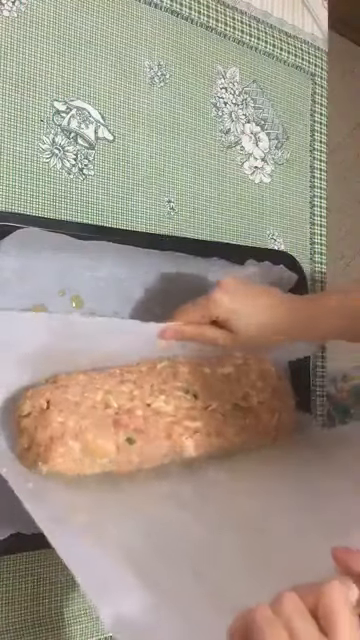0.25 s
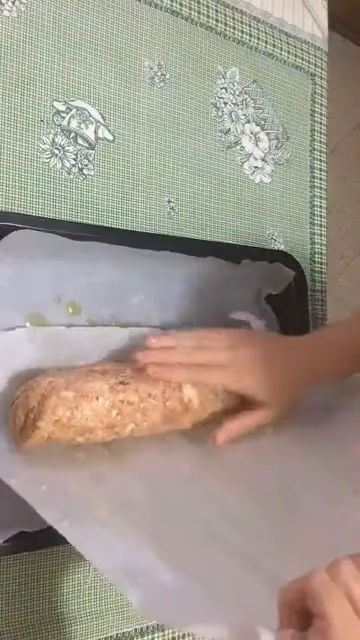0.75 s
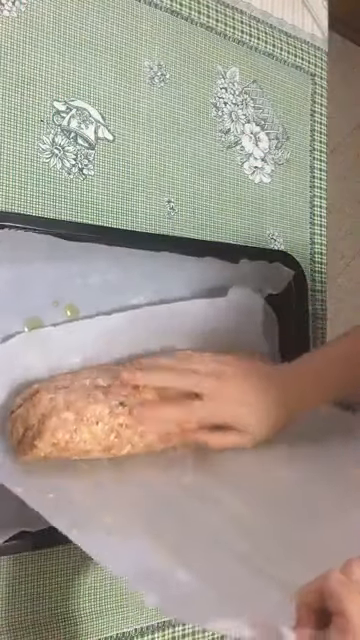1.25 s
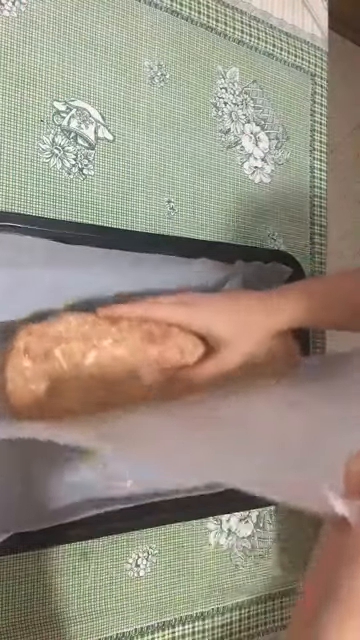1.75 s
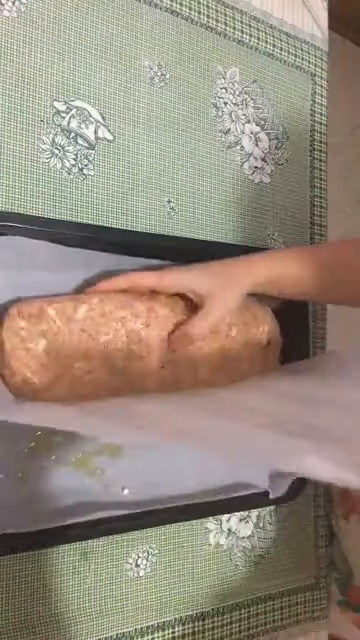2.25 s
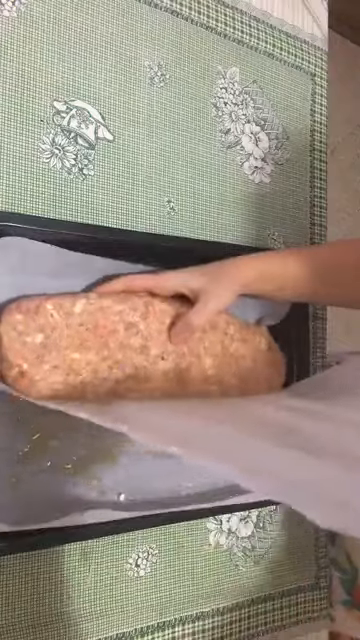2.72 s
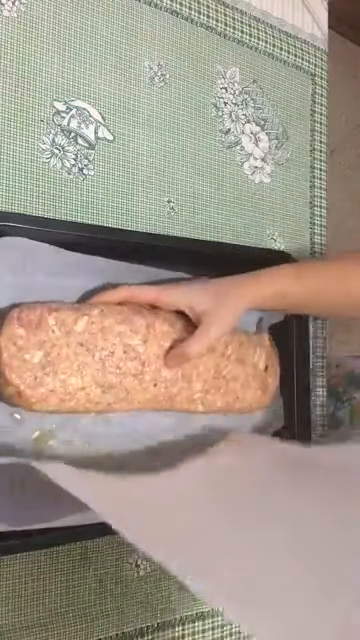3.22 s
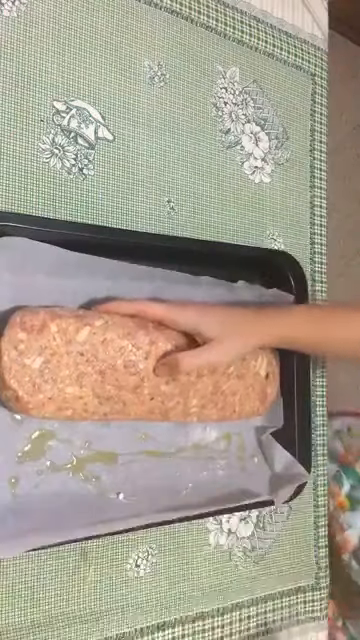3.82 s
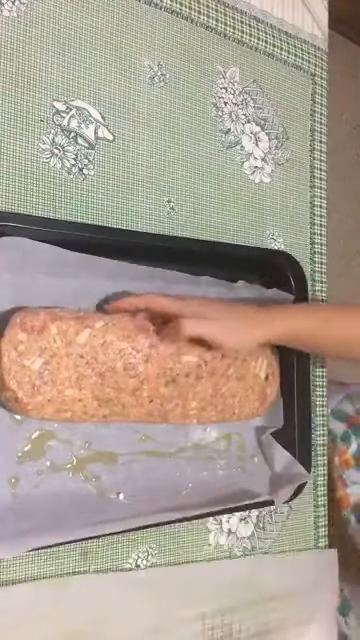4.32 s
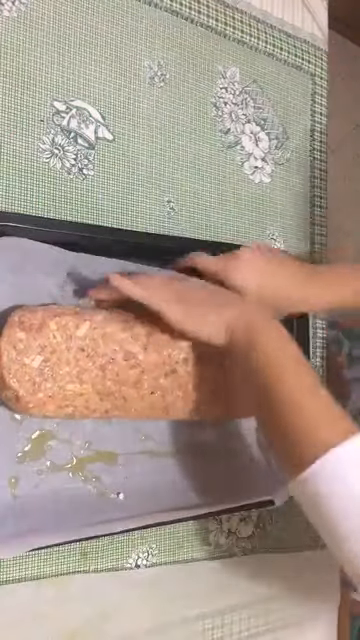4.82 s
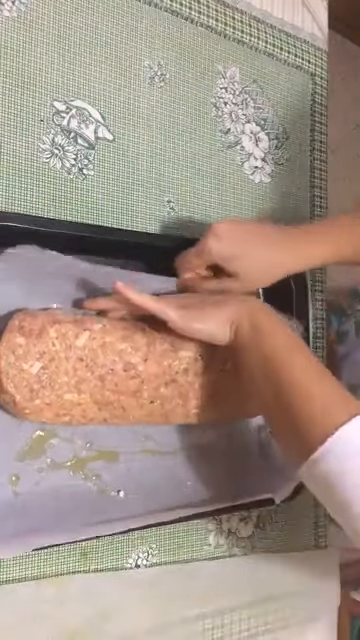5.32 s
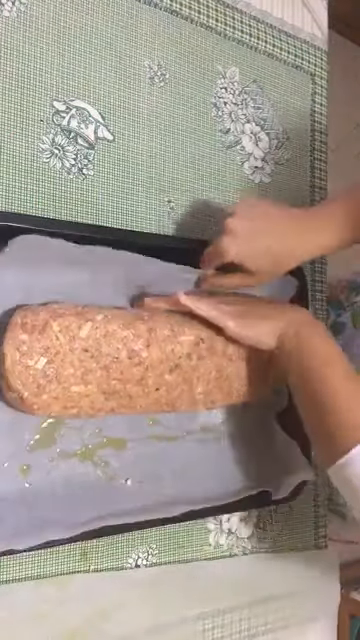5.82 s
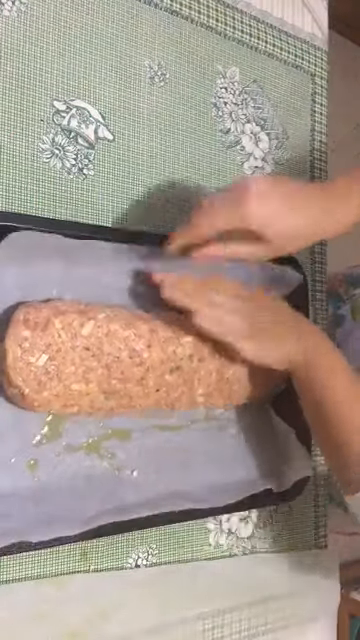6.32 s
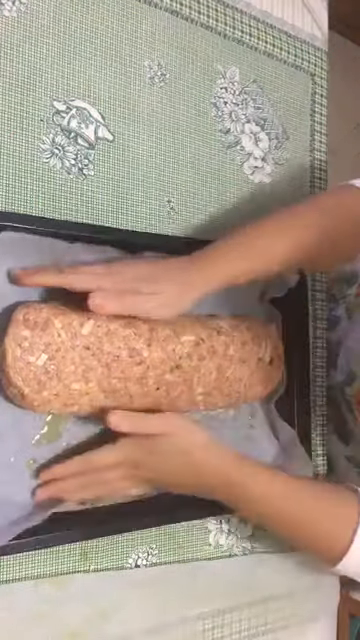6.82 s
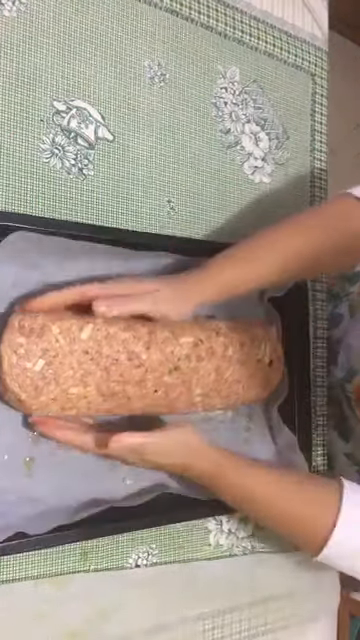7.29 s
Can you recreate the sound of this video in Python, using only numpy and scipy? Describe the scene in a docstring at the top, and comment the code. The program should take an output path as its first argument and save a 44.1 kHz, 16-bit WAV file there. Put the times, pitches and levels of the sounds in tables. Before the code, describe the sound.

Close, dry, mono sound in a small kitchen with very quiet steady air and short diffuse echoes. From 0 to 1.3 seconds parchment slides in soft, overlapping tugs, a dull rustle with fine crisp crackle and small snaps. A fuller stroke with brighter snaps comes around 1.9 to 2.0, then gentler rubbing and sparse ticks until 3.5. At about 3.75 a brisk crumple swells with a light tray scuff, fading to a near lull from 4.0 to 4.7, with a faint tray touch at 4.25. A low thump and metallic knock at 4.83 open the busiest part: dense bright crumpling and sharp snaps from 5.0 to 6.3, the hardest crack near 5.95. A brief dip at 6.45, then a strong papery scrape and soft table thud at 6.6, another thud at 6.9, a crisp burst at 7.06, and thinning crackle to the end at 7.5.

```python
"""Loaf, parchment and metal tray

A loaf is rolled off baking parchment onto a paper-lined tray on a kitchen table, then patted into shape.
The paper slides with a dull rustle and crackles as tiny creases flip: ringing grains mixed with smooth hiss.
Large folds buckle in snaps of band-passed noise; hands bump tray and table, which ring in decaying sines.
Low table rumble, steady room air and faint diffuse echoes surround it, all heard close up in mono."""
import sys
import numpy as np
from scipy import signal
from scipy.fft import rfft, irfft
from scipy.io import wavfile
from scipy.ndimage import uniform_filter1d

SR = 44100
rng = np.random.default_rng(int(sys.argv[2]) if len(sys.argv) > 2 else 0)


def inscribe(sig):
    """Save sig as 16-bit PCM at rate SR to the path in sys.argv[1].

    A 1-D sig is mono; a 2-D sig holds one channel per row.
    Samples are clipped to [-1, 1] before scaling.
    """
    pcm = np.round(np.clip(np.atleast_2d(sig).T, -1, 1) * 32767)
    wavfile.write(sys.argv[1], SR, pcm.astype(np.int16))


def boost(x):
    """Linear amplitude factor 10**(x/20) for a level x in decibels (scalar or array-like)."""
    u = np.asarray(x, float) / 20
    return 10 ** u


N = 332955


def curve(rows):
    """A (time in s, level in dB) table joined by straight lines, one value a sample."""
    s, level_db = np.transpose(rows)
    return np.interp(np.arange(N) / SR, s, level_db)


def coloured(x, spectrum):
    """Minimum-phase filter with the given spectrum, so nothing sounds early; rms 1."""
    size = 8192
    hz, db = np.transpose(spectrum)
    bins_hz = np.arange(size // 2 + 1) * SR / size
    log_gain = np.interp(np.log(bins_hz + 1), np.log(hz), db) * np.log(10) / 20
    # folding the cepstrum onto positive time makes the phase minimal
    cepstrum = irfft(log_gain)
    cepstrum[1:size // 2] *= 2
    cepstrum[size // 2 + 1:] = 0
    impulse = irfft(np.exp(rfft(cepstrum)))
    out = signal.fftconvolve(x, impulse)[:N]
    return out / np.sqrt(np.mean(out ** 2))


def placed(seconds, gains, shapes):
    """Short shapes laid on the time line."""
    out = np.zeros(N + len(shapes[0]))
    for s, gain, shape in zip(seconds, gains, shapes):
        start = round(s * SR)
        out[start:start + len(shape)] += gain * shape
    return out[:N]


def drift(rate_hz):
    """Slow chance: noise twice through a one-pole low-pass; spread 1."""
    r = np.exp(-2 * np.pi * rate_hz / SR)
    noise = rng.standard_normal(N + SR)
    slow = signal.lfilter([1], [1, -2 * r, r * r], noise)[SR:]     # the first second settles the filter
    return slow / np.std(slow)


def ring(clicks, hz, t60_s):
    """A resonance: a unit click sets a sine of height 1 ringing, down 60 dB after t60_s."""
    r = boost(-60 / (t60_s * SR))
    w = 2 * np.pi * hz / SR
    return signal.lfilter([0, np.sin(w)], [1, -2 * r * np.cos(w), r * r], clicks + 1e-18)


# Separate tugs and presses on the paper; levels are rms, before the treble changes.
# Columns: peak_s, crackle_db, slide_db, rise_s, fall_s
# rise_s and fall_s take crackling through 20 dB; anything under 0.005 s acts as 0.005 s
MOVES = [(0.0, -48, -52.5, .1, 0.26), (.3, -50, -61, .03, 0.1), (0.451, -43.5, -51, .35, 0.19),
         (0.631, -45, -52.5, .025, 0.35), (0.781, -43, -48, .3, 0.27), (0.961, -50, -51.5, .2, -0.18),
         (1.119, -58.5, -58, 0.33, 0.2), (1.3, -47.5, -51.5, 0.085, 0.44), (1.472, -47.5, -57.5, .7, 0.67),
         (1.89, -42.5, -54.5, .25, 0.5), (2.003, -45, -48.5, .2, 0.1), (2.499, -46.5, -52.5, .6, 0.42),
         (3.148, -53, -57, .5, 0.5), (3.516, -44.5, -53.5, .02, 0.12), (3.679, -53.5, -78, .2, 0.35),
         (3.77, -37, -44.5, 0.11, 0.31), (4.15, -61, -71, 0.085, 0.54), (4.216, -62, -49, 0.13, 0.18),
         (4.644, -65.5, -75, .04, 0.27), (4.839, -53, -77, 0.034, 0.7), (4.928, -63, -50, 0.091, 0.44),
         (5.01, -47.5, -62, 0.014, 0.7), (5.079, -38, -74, .05, 0.35), (5.254, -34, -46, 0.09, 0.15),
         (5.38, -36, -49.5, .12, 0.2), (5.486, -40.5, -52, .12, 0.2), (5.64, -43.5, -51, 0.013, -0.8),
         (5.732, -33, -47.5, .12, 0.12), (5.885, -34, -52, .08, 0.13), (5.957, -37.5, -46.5, .08, 0.21),
         (6.071, -36, -53.5, 0.13, 0.36), (6.226, -41.5, -62.5, .03, -0.5),
         (6.29, -40.5, -46.5, .2, 0.1449), (6.579, -35, -46.5, .005, 0.0854),
         (6.612, -38, -39.5, .02, 0.09), (6.709, -38, -51, 0.057, 0.11), (6.901, -39.5, -56, 0.2, 0.27),
         (6.981, -41.5, -55, 0.11, -0.05), (7.064, -35.5, -52, 0.01, 0.0749),
         (7.205, -47.5, -53.5, .008, 0.22), (7.38, -43.5, -57, .2, 0.06), (7.55, -51.5, -59.5, .08, 2)]


def handling():
    """Each move swells to its peak and dies away; their powers add to give crackle and sliding level in dB."""
    roundness = 1.22     # above 1 a move holds near its peak, then stops quickly
    slide_lingers = 1.24     # sliding loses fewer dB than crackling away from the peak
    rest_crackle_db, rest_slide_db = -80, -73.5     # the paper settling between moves
    t = np.arange(0, N + 64, 64) / SR
    peak_s, crackle_db, slide_db, rise_s, fall_s = np.transpose(MOVES)[:, :, None]
    before = (peak_s - t) / np.maximum(rise_s, .005)
    after = (t - peak_s) / np.maximum(fall_s, .005)
    away_db = 20 * np.where(t < peak_s, before, after) ** roundness
    crackle = np.sum(boost(crackle_db - away_db) ** 2, axis=0) + boost(rest_crackle_db) ** 2
    slide = np.sum(boost(slide_db - away_db / slide_lingers) ** 2, axis=0) + boost(rest_slide_db) ** 2
    return [np.interp(np.arange(N) / SR, t, 10 * np.log10(power)) for power in (crackle, slide)]


def creases(per_s, spread_db, clump_db, cycles, low_hz, high_hz):
    """Tiny creases flip at random, in clumps; each rings at one of 14 pitches, down 60 dB after `cycles`."""
    sizes = boost(spread_db * np.minimum(rng.exponential(1, N), 5)) * rng.choice([-1, 1], N)
    chance = per_s * boost(clump_db * drift(30)) / SR     # per_s is the rate when the drift is at zero
    clicks = sizes * (rng.random(N) < chance)
    pitches = np.geomspace(low_hz, high_hz, 14)
    dealt = rng.integers(0, 14, N)
    return sum(ring(clicks * (dealt == k), hz, cycles / hz) for k, hz in enumerate(pitches))


def rustle(grains, grain_share, colour, flicker_db, flicker_hz):
    """Grains over the smooth hiss of paper rubbing on paper, both in the colour of the sheet; rms 1."""
    white = signal.lfilter([1, -.7], [1], grains)     # the summed rings lean to the bass; level them
    hiss = rng.standard_normal(N)
    mix = np.sqrt(grain_share) * white / np.std(white) + np.sqrt(1 - grain_share) * hiss
    return coloured(mix * boost(flicker_db * drift(flicker_hz)), colour)


def brightened(x, bright_db, split_hz):
    """Taut, dry paper lifts the treble; slack paper loses it."""
    treble = signal.sosfilt(signal.butter(2, split_hz, "high", fs=SR, output="sos"), x)
    body = signal.sosfilt(signal.butter(2, split_hz, fs=SR, output="sos"), x)
    return body - boost(bright_db) * treble     # the two halves meet in opposite phase


# Spectrum of the crackle, relative. Columns: pitch_hz, level_db (per Hz)
CRACKLE_COLOUR = [(290, -91), (500, -64), (1440, -1.5), (3110, 0.5), (3810, -2), (8700, -1.5),
                  (10400, -4.5), (12700, -5), (16000, -2.5)]
# Treble lift of the crackle, before the dulling of strong crumpling. Columns: time_s, level_db
CRACKLE_TREBLE = [(0, -6), (.95, 2), (1.1, -9), (1.35, -0.5), (3.1, 3.5), (3.4, 4.5), (3.6, -2.5),
                  (4.1, -4.5), (4.3, 6), (4.57, 0), (4.63, 19), (4.95, 6.5), (5.1, 0.5), (6.3, -3.5),
                  (6.55, -19), (6.6, 2), (7.1, -0.5), (7.25, 9), (7.55, -5.5)]


def paper_crackle(crackle_db):
    """Fine, short-ringing creases; strong crumpling sounds fuller, with less treble."""
    dulling, even_at_db = 0.11, -60     # dB of treble lost per dB of crackle above even_at_db
    bright_db = curve(CRACKLE_TREBLE) - dulling * (crackle_db - even_at_db)
    fine = creases(per_s=2500, spread_db=4, clump_db=6, cycles=5, low_hz=1300, high_hz=14000)
    sheet = rustle(fine, grain_share=0.36, colour=CRACKLE_COLOUR, flicker_db=2.6, flicker_hz=25)
    return brightened(boost(crackle_db) * sheet, bright_db, split_hz=5400)


# Spectrum of the sliding, relative, before its treble drifts. Columns: pitch_hz, level_db (per Hz)
SLIDE_COLOUR = [(130, -9.5), (220, -6.5), (350, -4), (480, -9.5), (700, -1.5), (1400, 3.5), (2000, 0),
                (3200, -3), (8000, -31.5)]


def paper_slide(slide_db):
    """Coarse, longer-ringing creases under much hiss give a dull rustle of drifting brightness."""
    coarse = creases(per_s=1500, spread_db=3, clump_db=3, cycles=14.5, low_hz=428, high_hz=2800)
    sheet = rustle(coarse, grain_share=0.13, colour=SLIDE_COLOUR, flicker_db=1.5, flicker_hz=230)
    # the sheet's curve keeps changing
    return brightened(boost(slide_db) * sheet, 1.5 * drift(4), split_hz=1200)


# Table rumble while the hands work. Columns: time_s, level_db (rms)
RUMBLE_LEVEL = [(0.0, -67.5), (1.2, -66), (2.2, -77.5), (3.6, -68), (4.6, -75.5), (5.9, -67), (6.5, -69),
                (7.55, -71)]
# Spectrum of the rumble, relative. Columns: pitch_hz, level_db (per Hz)
RUMBLE_COLOUR = [(20, -11), (35, -3), (50, -6), (100, -6), (200, -14.5), (400, -11), (800, -48)]


def table_rumble():
    """Low coloured noise of the table, following the work of the hands."""
    return boost(curve(RUMBLE_LEVEL)) * coloured(rng.standard_normal(N), RUMBLE_COLOUR)


# Spectrum of the room air, relative. Columns: pitch_hz, level_db (per Hz)
AIR_COLOUR = [(18, -45), (30, -18), (170, -4.5), (259, -3.5), (303, -8), (355, 0), (426, -36.5),
              (1540, -61), (13700, -43), (16000, -79)]


def room_air():
    """The kitchen's steady air: coloured noise at -73.5 dB rms."""
    return boost(-73.5) * coloured(rng.standard_normal(N), AIR_COLOUR)


def snaps(folds):
    """A fold shudders as it gives, cracks over and shudders out, round its centre pitch with a thin edge above."""
    width_oct, crack_s = .9, .0003     # half-width of the band; time constant of the crack
    shudder_db, edge_db = -2.5, -9     # against the crack; treble edge against the band
    rise_share = .16     # part of the length spent shuddering before the crack
    size, lead = 2048, 512
    t = (np.arange(size) - lead) / SR
    bursts = []
    for (_, _, hz, ms), noise in zip(folds, rng.standard_normal((len(folds), size))):
        length_s = np.clip(ms, .5, 20) / 1000
        shudder = np.exp(-np.abs(t) / np.where(t < 0, rise_share * length_s, (1 - rise_share) * length_s))
        crack = (t >= 0) * np.exp(-np.abs(t) / crack_s)
        give = noise * (crack + boost(shudder_db) * shudder)
        low_hz, high_hz = hz / 2 ** width_oct, min(hz * 2 ** width_oct, .45 * SR)
        band = signal.lfilter(*signal.butter(2, (low_hz, high_hz), "band", fs=SR), give)
        edge = signal.lfilter(*signal.butter(2, min(high_hz, 8000), "high", fs=SR), give)
        burst = band + boost(edge_db) * edge
        bursts.append(burst / np.sqrt(2 * np.max(uniform_filter1d(burst ** 2, size=16))))
    start_s, peak_db = np.transpose(folds)[:2]
    return placed(np.maximum(start_s - lead / SR, 0), boost(peak_db), bursts)


# The clearest folds that buckle. Columns: crack_s, peak_db, centre_hz, length_ms
# length_ms sums the shudder's two time constants and acts only between 0.5 and 20 ms
CLEAR_FOLDS = [(.0911, -29.5, 3700, 2.8), (.1719, -34, 2300, 2.9), (.207, -29.5, 3350, 4.1),
               (.2214, -35, 2980, 2.8), (.2344, -38, 8360, 2), (.2478, -35.5, 1370, 2.2),
               (.2975, -35.5, 3040, 3), (.4859, -24, 1490, 4.1), (.5016, -28, 7300, 1.9),
               (.648, -23.5, 2210, 6.4), (.8815, -32.5, 4500, 2), (.8903, -34, 3500, 2),
               (.899, -29, 2270, 3), (1.047, -45, 1300, 6.7), (1.2812, -26.5, 2310, 2.8),
               (1.5127, -30.5, 7220, 0.85), (1.7622, -33, 4330, 7.2), (1.8228, -30, 4870, 10.4),
               (1.868, -27, 3640, 2.5), (1.8861, -20.5, 6500, 7.5), (1.978, -30, 4260, 16),
               (2.0138, -29.5, 4230, 2.8), (2.368, -32.5, 3460, 3.6), (2.5491, -26.5, 3030, 0.93),
               (2.8313, -39, 2530, 6.7), (3.144, -32, 5830, 29), (3.165, -32, 4730, 4),
               (3.196, -31, 3280, 1.7), (3.212, -34, 2240, 1.5), (3.2448, -28, 5400, 2.6),
               (3.3282, -34, 2380, 4.9), (3.341, -29.5, 5300, 1.8), (3.375, -36, 1700, 2),
               (3.5255, -35, 2520, 6.2), (3.7447, -21.5, 4330, 20), (3.769, -19, 3140, 3),
               (3.8225, -35, 2470, 6.7), (3.8495, -29.5, 6000, 3.6), (3.8838, -22.5, 4340, 0.43),
               (3.9234, -28.5, 5960, 2.1), (4.188, -39, 1980, 6.3), (4.2576, -32.5, 1490, 8),
               (4.381, -40.5, 5150, 4.3), (4.687, -35, 5900, 6.7), (4.8265, -28, 7700, 5.6),
               (4.8275, -19, 1030, 5), (5.005, -17, 8700, 4.5), (5.064, -21, 4600, 4.4),
               (5.0827, -18, 7600, 4.7), (5.0926, -16.5, 4300, 2.1), (5.13, -26, 3480, 4),
               (5.202, -26, 2880, 14), (5.22, -13.5, 4970, 1), (5.232, -16, 5200, 3.5),
               (5.247, -14, 4500, 3.7), (5.2574, -14.5, 4460, 10.5), (5.303, -26.5, 2380, 21),
               (5.3193, -15.5, 6200, 1.5), (5.357, -37, 3800, 3.1), (5.371, -18, 2760, 4.2),
               (5.384, -26, 4000, 3.4), (5.422, -25.5, 4730, 2.5), (5.483, -28.5, 4640, 8.9),
               (5.6284, -20.5, 2070, 3.7), (5.7097, -19.5, 2260, 3.8), (5.7278, -16.5, 4870, 2.4),
               (5.7325, -19, 2400, 3.6), (5.7467, -14.5, 2860, 1.5), (5.8716, -13, 5950, 3.6),
               (5.8821, -22.5, 3470, 7.6), (5.904, -21, 4000, 9.9), (5.917, -21, 6500, 10),
               (5.9481, -6, 3820, 1.25), (6.0263, -22, 2880, 4.3), (6.0835, -25, 2960, 16),
               (6.218, -22.5, 2780, 3.2), (6.2304, -21.5, 2100, 6.1), (6.2543, -22.5, 5460, 4.8),
               (6.2989, -25, 1480, 13), (6.355, -24, 4360, 1.8), (6.434, -39, 4000, 4.8),
               (6.5785, -20.5, 4140, 7.2), (6.585, -24, 3440, 15), (6.6116, -20, 2750, 6.2),
               (6.6364, -24, 1360, 8.6), (6.7053, -19, 3230, 9), (6.7404, -23.5, 5240, 2.1),
               (6.809, -23.5, 2800, 1.6), (6.8228, -30, 4000, 4), (6.8519, -27, 4300, 2),
               (6.891, -27, 4000, 15), (6.9424, -28, 5200, 9.9), (6.9675, -26.5, 7070, 6),
               (7.0545, -21.5, 4500, 4), (7.0635, -17, 4640, 13), (7.204, -27.5, 5360, 8.8),
               (7.33, -25.5, 5070, 3.2), (7.368, -32.5, 5000, 8.9)]


def large_folds():
    """Large folds store the strain of the sheet, then buckle in distinct snaps."""
    return snaps(CLEAR_FOLDS)


def small_folds(crackle_db, count):
    """Lesser folds buckle at random, more often and louder where the paper is worked hard."""
    over_db, spread_db = 6, 1.8     # least height above the crackle; random extra
    chance, size = rng.random(count), rng.exponential(1, count)
    pitch, length = rng.standard_normal((2, count))
    busy = np.cumsum(boost(crackle_db / 4))
    at = np.searchsorted(busy, chance * busy[-1])
    peak_db = crackle_db[at] + over_db + spread_db * np.minimum(size, 3)
    centre_hz, length_ms = 4000 * 1.7 ** pitch, 4 * 1.5 ** length
    return snaps(np.transpose([at / SR, peak_db, centre_hz, length_ms]))


# Hands land on the tray; levels are drive into the modes.
# Columns: start_s, table_db, tray_db, contact_ms, hardness_db (per octave), spot (0-1 along the tray)
BUMPS = [(0.205, -71, -52, 2.2, -1, .42), (3.736, -62, -37, 15, 4, .21), (4.252, -85, -38, 16, 8, .36),
         (4.271, -85, -46, 115, 4, .35), (4.826, -42.5, -30, 1.5, -0.5, .22),
         (4.885, -70, -33, 105, 7, .43), (5.635, -62, -68, 6.4, 4, .22), (6.301, -68, -46, 110, -3, .3),
         (6.599, -45.5, -50, 15, 6, .22), (6.906, -44, -58, 18.6, -4, .42), (7.228, -66, -40, 125, 3, .43)]
# Low resonances of the table. Columns: pitch_hz, level_db, t60_s
TABLE_MODES = [(47.4, 1, 0.54), (65, 4, 0.33), (98, -1, 0.21), (133, -2, 0.46)]
# Resonances of the metal tray, before its bass is thinned. Columns: pitch_hz, level_db, t60_s
TRAY_MODES = [(352, -2, .16), (520, -9, .06), (657, -1, .1), (775, -3, .09), (1010, -7, .06),
              (1245, -1, .08), (1340, -4, .07), (1530, -5, .05)]


def bumps(rubbing):
    """A hand pushes smoothly on the table and roughly on the tray, which the sliding paper rings too."""
    middle_hz, thin_hz = 760, 287     # pivot of the hardness tilt; bass cut of the tray
    rattle_db, rattle_s = -14.5, 0.046
    t = np.arange(8192) / SR
    start_s, table_db, tray_db, contact_ms, hardness_db, spot = np.transpose(BUMPS)
    touch = np.sin(np.pi * np.clip(t / (contact_ms[:, None] / 1000), 0, 1)) ** 2
    push = touch / np.sum(touch, axis=1, keepdims=True)
    # the tray rattles on after the touch
    rough = touch ** 0.35 + boost(rattle_db) * np.exp(-t / rattle_s)
    scuff = rng.standard_normal(touch.shape) * rough / np.sqrt(np.sum(rough ** 2, axis=1, keepdims=True))
    table, tray = np.zeros(N), np.zeros(N)
    for hz, level_db, t60_s in TABLE_MODES:
        table += ring(placed(start_s, boost(table_db + level_db), push), hz, t60_s)
    for k, (hz, level_db, t60_s) in enumerate(TRAY_MODES):
        # knuckles and nails favour the high modes
        blow_db = tray_db + hardness_db * np.log2(hz / middle_hz)
        # a mode stays quiet when touched at one of its nodes
        reach = np.sin(np.pi * (k + 1) * spot)
        drive = placed(start_s, reach * boost(blow_db), scuff) + rubbing
        tray += boost(level_db) * ring(drive, hz, t60_s)
    # the tray's ringing keeps clear of the bass
    return table + signal.lfilter(*signal.butter(2, thin_hz, "high", fs=SR), tray)


def kitchen_echoes(x):
    """Diffuse echoes: noise that dies away, duller than the direct sound."""
    t60_s, first_wall_s, wall_cut_hz = 0.21, 0.0079, 3000
    t = np.arange(SR // 2) / SR
    echoes = rng.standard_normal(len(t)) * boost(-60 * t / t60_s) * (t > first_wall_s)
    echoes = signal.lfilter(*signal.butter(1, wall_cut_hz, fs=SR), echoes)
    return signal.fftconvolve(x, echoes / np.sqrt(np.sum(echoes ** 2)))[:N]


def scene():
    """Paper, tray and table in a kitchen with its steady air, the same in both channels."""
    crackle_db, slide_db = handling()
    slide = paper_slide(slide_db)
    paper = paper_crackle(crackle_db) + slide + large_folds() + small_folds(crackle_db, count=45)
    echoes = boost(-17) * kitchen_echoes(paper)
    hands = bumps(rubbing=boost(-63) * slide)
    mono = paper + echoes + hands + table_rumble() + room_air()
    return np.stack([mono, mono])


def low_pass(x):
    """Removes everything above the highest recorded frequency."""
    return signal.sosfilt(signal.butter(12, 16670, fs=SR, output="sos"), x)


def record(dry):
    """The microphone loses the deepest bass, below 39 Hz, and the top is cut steeply by 16280 Hz."""
    bass_cut = signal.butter(4, 39, "high", fs=SR, output="sos")
    top_cut = signal.cheby2(10, 60, 16280, fs=SR, output="sos")
    mix = signal.sosfilt(top_cut, signal.sosfilt(bass_cut, dry))
    return low_pass(mix)


dry = scene()
out = record(dry)
inscribe(out)
```